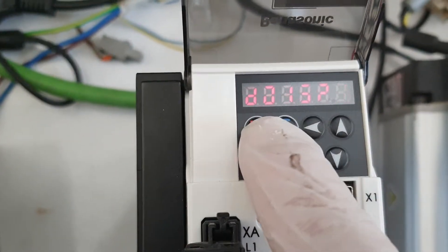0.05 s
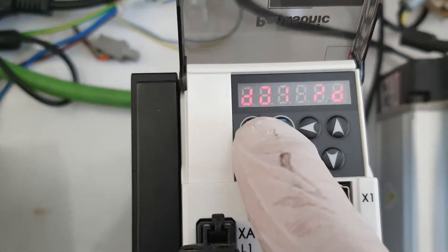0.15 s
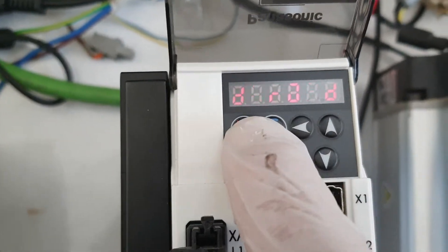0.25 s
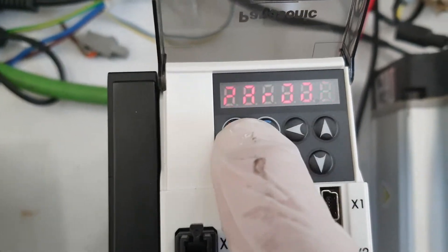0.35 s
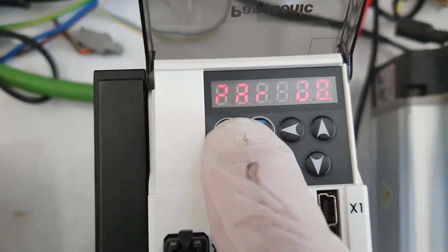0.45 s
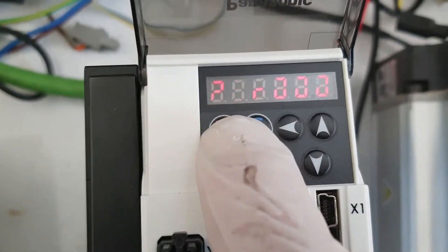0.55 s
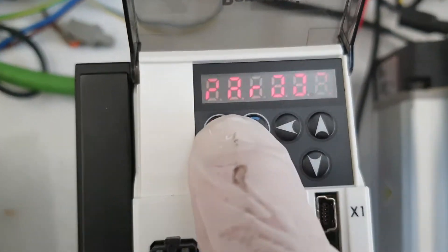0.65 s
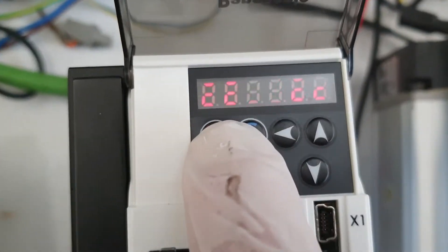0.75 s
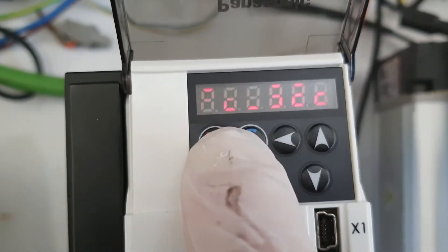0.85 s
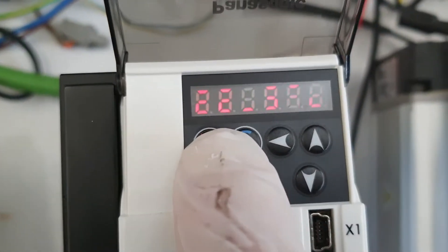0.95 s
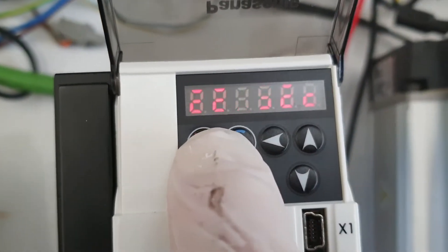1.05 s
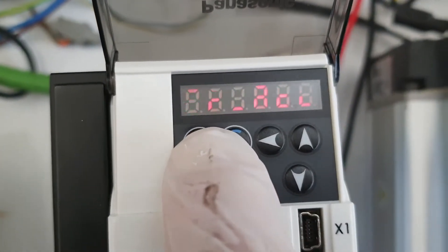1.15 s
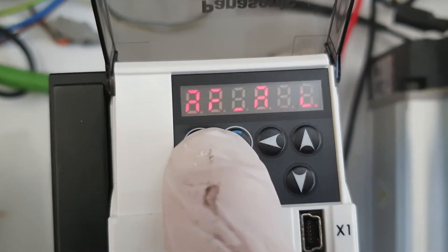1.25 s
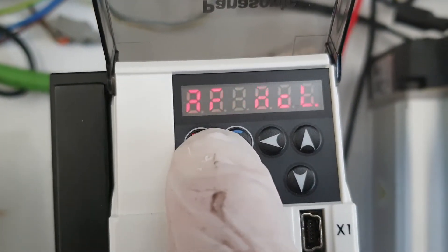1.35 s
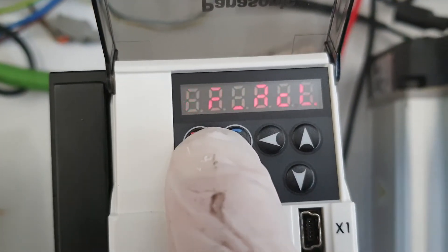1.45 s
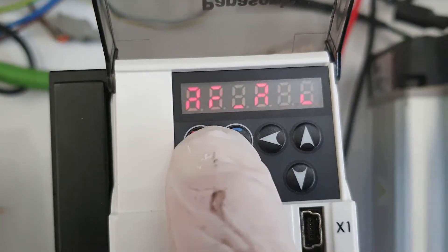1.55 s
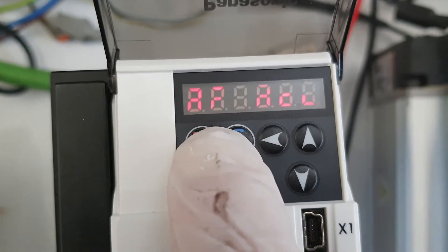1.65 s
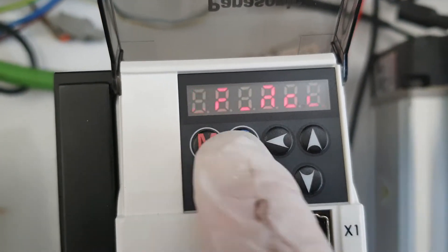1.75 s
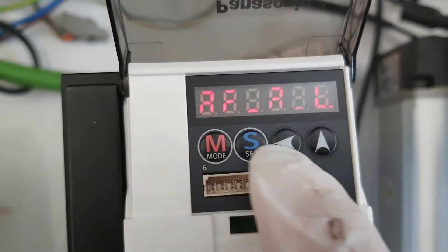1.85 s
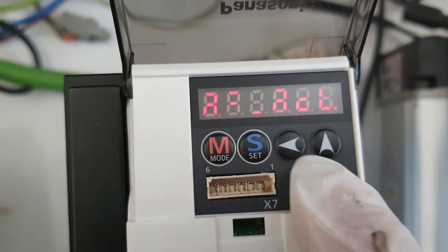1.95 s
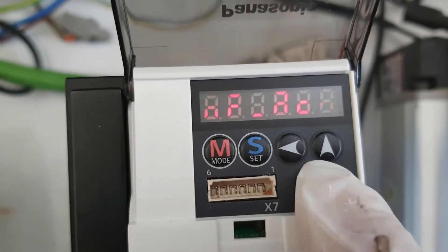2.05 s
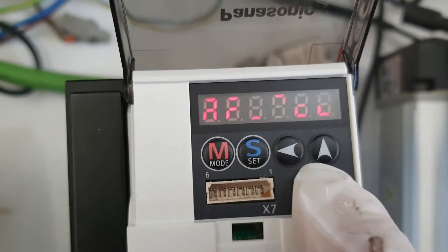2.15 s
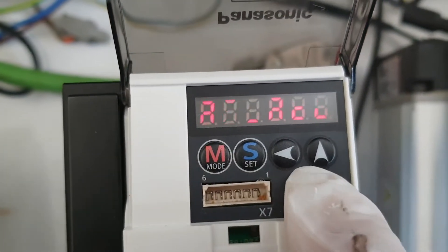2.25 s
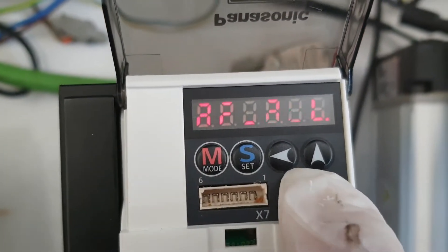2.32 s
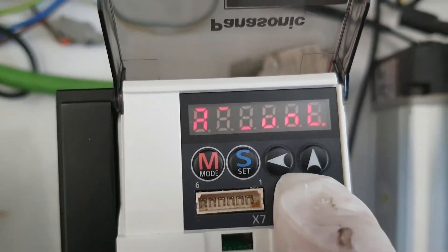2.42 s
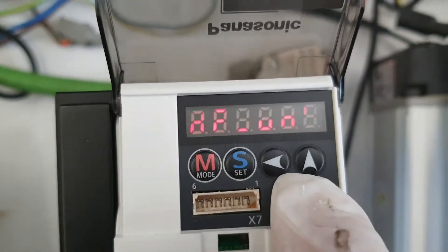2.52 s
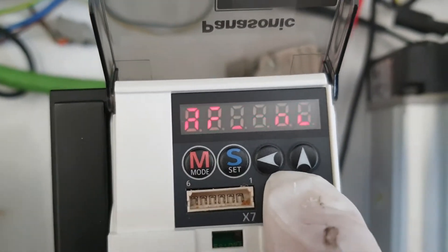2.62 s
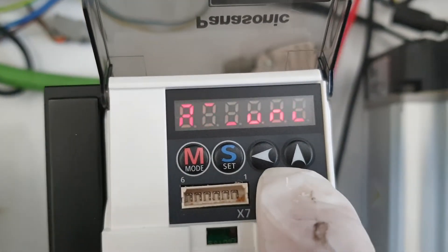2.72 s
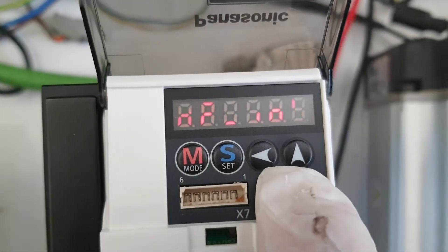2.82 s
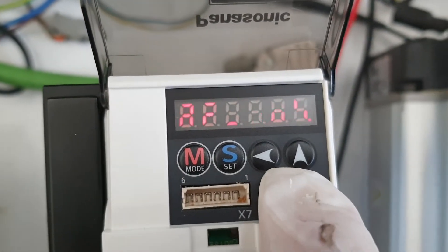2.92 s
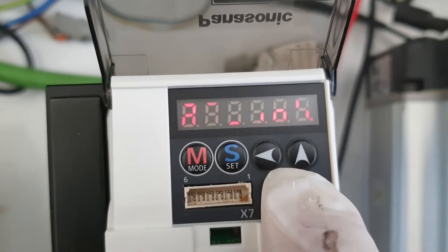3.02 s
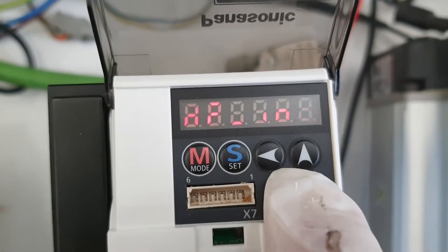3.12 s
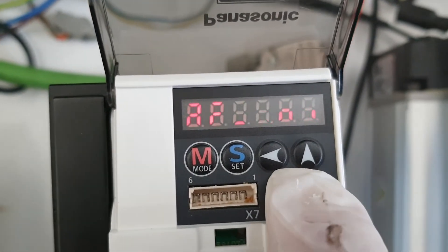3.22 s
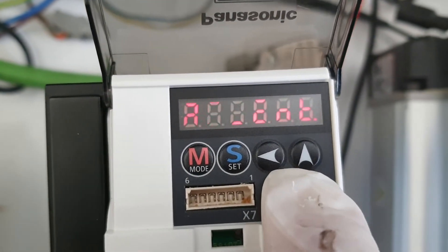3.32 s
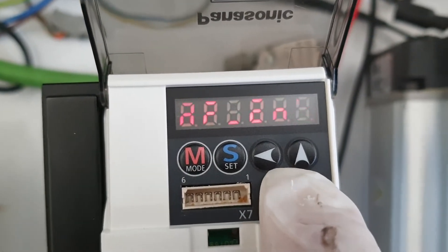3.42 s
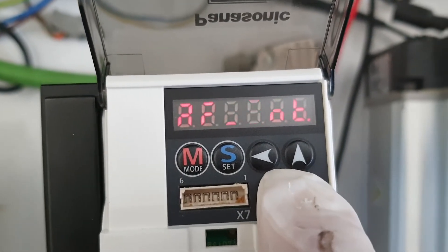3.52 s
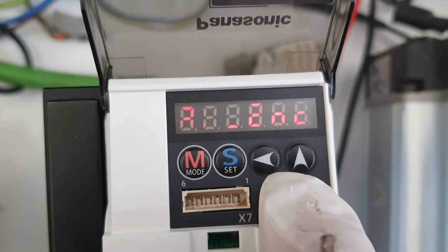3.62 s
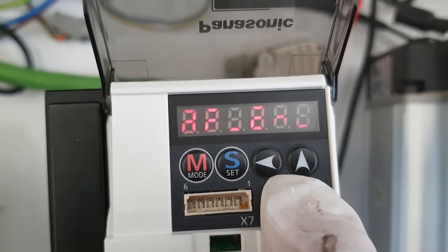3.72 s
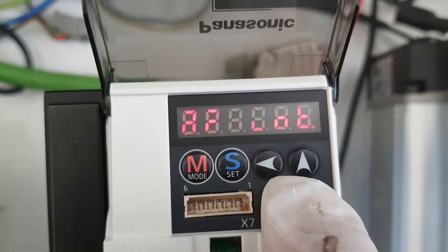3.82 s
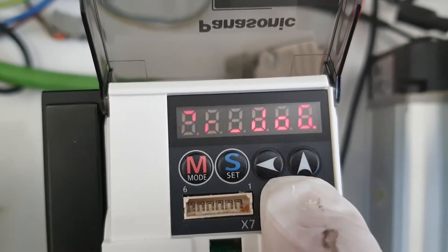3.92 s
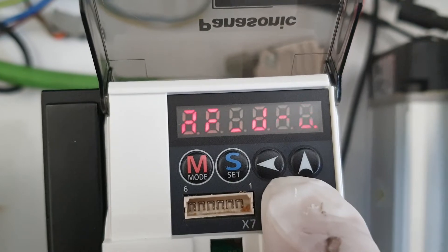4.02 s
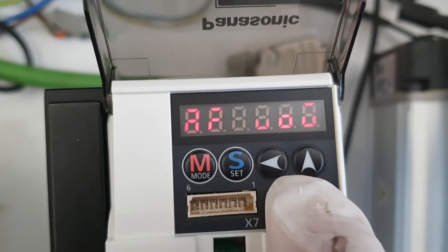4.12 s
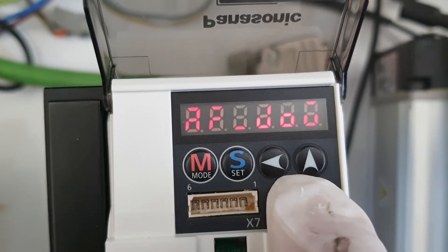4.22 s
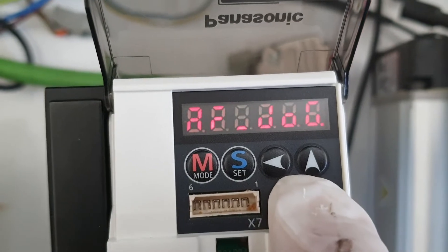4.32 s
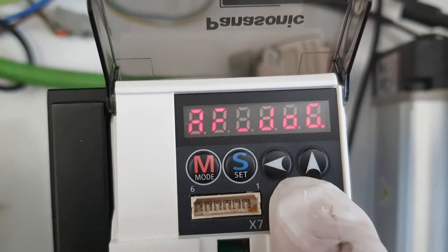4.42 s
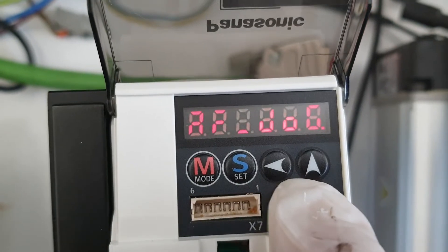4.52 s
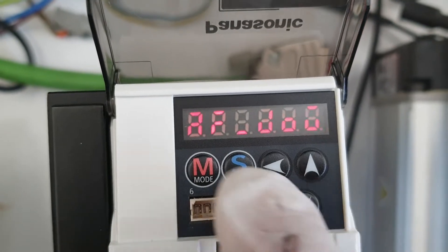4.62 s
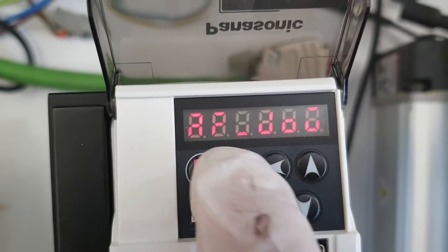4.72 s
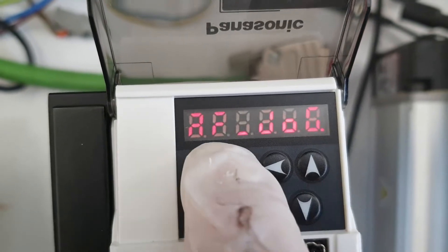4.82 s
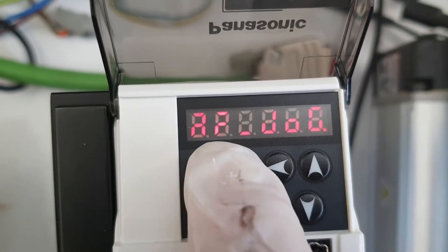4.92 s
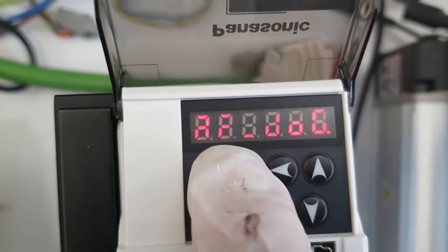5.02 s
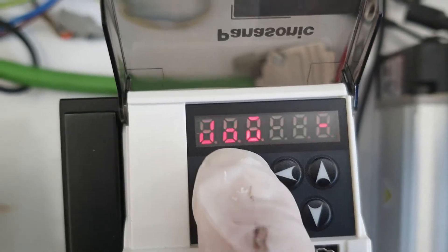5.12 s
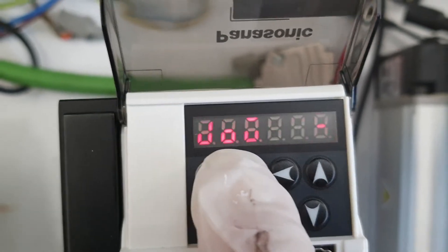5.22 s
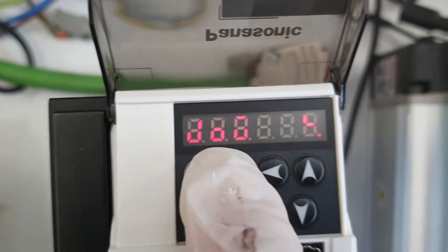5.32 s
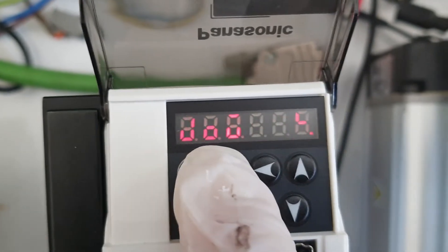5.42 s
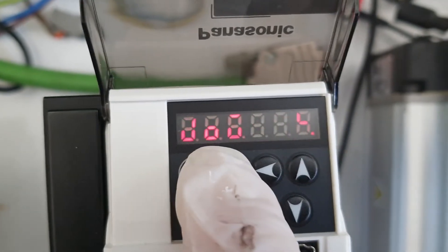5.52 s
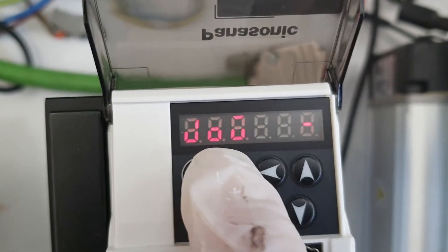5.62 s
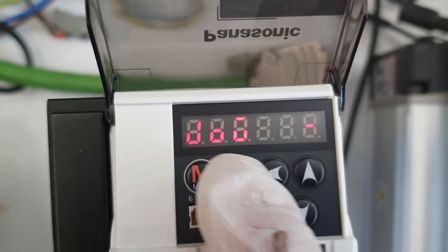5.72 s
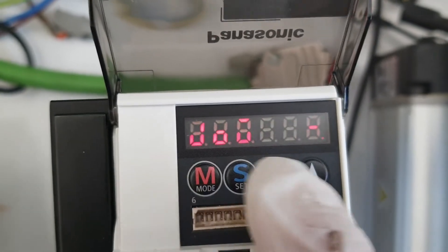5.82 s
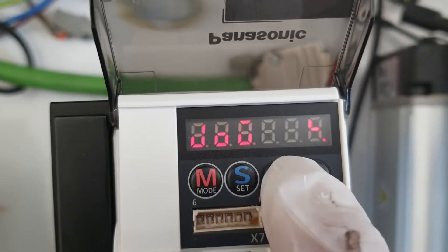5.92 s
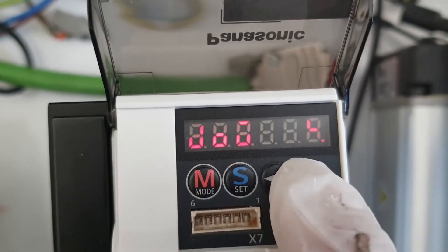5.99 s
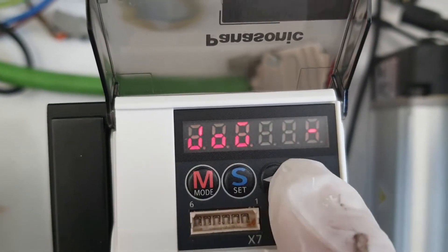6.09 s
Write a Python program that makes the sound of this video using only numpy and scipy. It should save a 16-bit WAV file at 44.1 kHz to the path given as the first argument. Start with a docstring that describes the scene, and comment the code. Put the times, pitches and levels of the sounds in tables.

```python
"""In a small workshop, a gloved finger works three little buttons on a motor drive's plastic panel.
Heard close up, the metal dome under each button snaps twice: going down and, louder, springing back.
Every snap makes the housing ring. The glove ticks and rustles on the plastic between the keys.
Ventilation fans hum steadily behind it, and the room adds a short echo to the clicks and the glove."""
import sys
import numpy as np
from scipy import signal
from scipy.fft import rfft, irfft, next_fast_len
from scipy.io import wavfile
from scipy.ndimage import map_coordinates

SR = 44100
rng = np.random.default_rng(int(sys.argv[2]) if len(sys.argv) > 2 else 0)


def to_wav(s):
    """Save 16-bit WAV."""
    ch = np.atleast_2d(s).T  # columns
    pcm = np.round(np.clip(ch, -1, 1) * 32767)  # PCM
    wavfile.write(sys.argv[1], SR, pcm.astype(np.int16))


N = 271215

# Levels in the tables are relative. A "lean" says how much louder the left side is than the right.
# each push of a button: down t/s, up t/s, key name, level/dB, treble slope of the release/(dB per octave)
KEYSTROKES = [(0.2717, 0.4395, "mode", -4.5, -21), (0.6941, 0.8483, "mode", -3, -10),
              (1.159, 1.3222, "mode", -3.5, -9), (2.3656, 2.5076, "arrow", -5, -4),
              (2.7522, 2.9313, "arrow", -5, -5), (3.254, 3.3923, "arrow", -5, -6.5),
              (3.907, 4.0548, "arrow", -5, -3), (5.1041, 5.1891, "set", -0.64, -4)]
# the side the fans are heard on: f/Hz, lean/dB
FAN_LEAN = [(30, -6), (100, -7.5), (300, -5.5), (600, -3), (1500, -4), (4000, -3), (12000, -2)]


def buttons(crack_db=-6, ring_db=0.32, rattle_db=-10, rattle_t60=0.042, attack_s=0.0004,
            lag_s=0.0001275, lid_s=0.0023, lid_db=-8.5, body_hz=2200, treble_hz=7200):
    """A snapping dome cracks; the housing rings and rattles. Returns the close sound and the room's share."""
    key_names = ["mode", "arrow", "set"]  # in the order of the level columns below
    # the notes the housing rings at (t60 is the time to fade by 60 dB):
    # f/Hz, t60/s, mode key level/dB, arrow key level/dB, set key level/dB, lean/dB
    housing_notes = [(990, 0.1, -49.5, -60, -46.5, -18.5), (1340, 0.053, -34, -31.5, -33, -3.5),
                     (1450, 0.046, -36, -39.5, -39.5, -5), (1718, 0.051, -40.5, -43, -50, -3.5),
                     (2238, 0.014, -27.5, -34, -30.5, -5.5), (2280, 0.026, -40, -60, -60.5, -18),
                     (2550, 0.015, -24.5, -31.5, -22, 7.5), (2730, 0.0053, -15, -35, -14.5, 6),
                     (2905, 0.024, -30, -43, -28.5, -7.5), (3596, 0.029, -31.5, -74, -34, 2),
                     (4188, 0.0092, -21, -18, -14.5, 16), (4117, 0.0057, -43, -16, -16.5, 25.5),
                     (5100, 0.016, -26, -24, -20, 3.5), (5300, 0.015, -35, -49, -28, 3.5),
                     (5980, 0.0038, -27.5, -34, -18, 27), (6460, 0.0021, -19.5, -21, -20, -23.5),
                     (7340, 0.0063, -20, -17, -24, -7), (7270, 0.0085, -14, -12, -37, 5.5),
                     (7880, 0.0011, -4, -8, -5.5, -4), (8800, 0.015, -67, -23, -25.5, 6.5),
                     (11200, 0.0037, -54.0, -24.5, -26, 6), (12000, 0.0093, -43.5, -61, -65, -19),
                     (12700, 0.0055, -33, -37, -47.5, -22), (14900, 0.0012, -55.0, -42, -27, -7)]
    crack_colour = [(150, -15.5), (500, -5), (1500, -15), (3200, -1), (4500, 0), (7500, 2.5), (9500, -9.5),
                    (12500, -6), (16000, -24.5)]  # the dome's own crack: f/Hz, level/dB
    casing_colour = [(200, -12), (700, -5.5), (1350, 2), (2100, 0), (2700, -0.5), (3300, -5.5), (4150, 1),
                     (5200, -1), (6500, 0), (8200, -3), (9800, -16.5), (13000, -11), (16000, -23)]  # the casing's many small notes blurred together: f/Hz, level/dB
    crack_lean_db = {"mode": -1, "arrow": 6, "set": 7}
    crack, casing = impulse(crack_colour), impulse(casing_colour)
    t = np.arange(len(crack)) / SR
    hz, t60, *key_db, lean_db = np.transpose(housing_notes)
    fade = amp(-60 * t / t60[:, None]) * (1 - np.exp(-t / attack_s))
    # neighbouring notes start in opposite directions; higher ones reach left and right out of step
    start_phase = np.pi * np.arange(len(hz)) - np.outer([0, 1], 1.92 * np.tanh(hz / 1900))
    close, into_room = np.zeros((2, 2, N))
    for s, key, db, body_db, treble_slope, room_db in dome_snaps():
        # the finger never lands twice on quite the same spot
        phase = start_phase + 0.12 * rng.standard_normal(len(hz))
        notes = np.sin(2 * np.pi * hz[:, None] * t + phase[:, :, None]) * fade
        note_gains = amp(key_db[key_names.index(key)]) * pan(lean_db)
        ring = np.einsum("cm,cmt->ct", note_gains, notes)  # add up the notes on each side
        # the keys are nearer the left, so the crack reaches the right later
        snap = filtered(pan(crack_lean_db[key]) * crack, lambda f: delay([0, lag_s], f))
        # the open lid throws it back a moment after
        snap = filtered(snap, lambda f: 1 + amp(lid_db) * delay(lid_s, f))
        jolts = rng.standard_normal((2, len(t))) * amp(-60 * t / rattle_t60)
        jolts /= np.linalg.norm(jolts[0])
        rattle = signal.fftconvolve(jolts, casing[None], axes=1)[:, :len(t)]
        click = amp(ring_db) * ring + amp(crack_db) * snap + amp(rattle_db) * rattle
        # a press is bright, a release duller
        body = lambda f: body_db / (1 + (f / body_hz) ** 6)
        treble = lambda f: treble_slope * np.log2(np.maximum(f / treble_hz, 1))
        touch = lambda f: amp(db + body(f) + treble(f))
        add(close, s, filtered(click, touch))
        add(into_room, s, amp(room_db) * filtered(np.array([casing, casing]), touch))
    return close, into_room


def dome_snaps(press_db=-10, press_body_db=1.5, press_db_per_octave=9.5, press_room_db=2):
    """A dome snaps down, then back. Going down is weaker, but fuller, brighter and more echoing."""
    body_db = {"mode": 0.2, "arrow": 1.5, "set": -0.5}  # how hard each key drives the housing's low notes: key name, level/dB
    for down, up, key, db, release_slope in KEYSTROKES:
        yield down, key, db + press_db, body_db[key] + press_body_db, press_db_per_octave, press_room_db
        yield up, key, db, body_db[key], release_slope, 0


def thin_ring(hz=2600, db=-69, t60=1.3):
    """A faint metallic ring lingers after the first press of the arrow key."""
    pressed_at = next(down for down, up, key, *_ in KEYSTROKES if key == "arrow")
    age = np.clip(np.arange(N) / SR - pressed_at, 0, None)
    return np.sin(2 * np.pi * hz * age) * amp(db - 60 * age / t60)


def glove_ticks(pop_size=0.51, gain_db=-2.0, chatter_db=-16.5, chatter_t60=0.022):
    """The rubber glove catches on the plastic and peels off with a tiny pop and a brief chatter."""
    ticks = [(0.212, -39, 0, -1), (0.6525, -34, 2, 4), (1.7766, -36.5, 4, 1), (1.8439, -19, 2, -1.3),
             (1.861, -24.5, 8, 2), (1.9521, -25.5, 12.5, 2), (1.955, -30, 3, 2.5), (1.967, -22, 7.5, 1.5),
             (2.23, -39, -2, 0), (2.2607, -24, 2, -1), (4.6378, -35, 6, 2), (5.031, -40, -9, -1.5),
             (5.8169, -38, 8, 5)]  # each catch: t/s, level/dB, lean/dB, brightness/(dB per octave)
    tick_colour = [(300, -21), (1200, 0.5), (2500, -0.5), (4000, -2), (7000, -1), (10000, -6.5),
                   (16000, -12.5)]  # the tone of a tick: f/Hz, level/dB
    out = np.zeros((2, N))
    for s, db, lean_db, brightness in ticks:
        pop = impulse([(hz, level + brightness * np.log2(hz)) for hz, level in tick_colour])
        t = np.arange(len(pop)) / SR
        force = amp(chatter_db - 60 * t / chatter_t60) * rng.standard_normal((2, len(t)))
        force[:, 0] += pop_size
        tick = signal.fftconvolve(force, pop[None], axes=1)
        add(out, s, amp(db + gain_db) * pan(lean_db) * tick)
    return out


def glove_slides(gain_db=-2, grain_db=2.5, lean_db=2, swell_db=23.5):
    """The sliding glove rustles in fine, uneven grains, loudest when it moves fastest."""
    slides = [(1.84, -55.5, 0.13, 0.17, -12), (4.64, -61.5, 0.078, 0.012, -2),
              (5.858, -59, 0.16, 0.14, -5.5), (6.024, -67.5, 0.048, 0.078, 3)]  # each slide: fastest t/s, level/dB, rise/s, fall/s, swish over rub/dB
    rub_colour = [(800, -13), (2500, -9), (5500, 0), (8000, -0.5), (10000, -8), (16000, -22)]  # the broad rub of the finger pad: f/Hz, level/dB
    swish_colour = [(3000, -30), (7000, -5), (9500, 2), (13000, 7), (15500, 2), (16500, -12)]  # the thin swish of a light touch: f/Hz, level/dB
    t = np.arange(N) / SR
    grain = amp(grain_db * wobble(500))
    rub = unit(filtered(rng.standard_normal((2, N)) * grain, lambda hz: amp(along(rub_colour, hz))))
    swish = unit(filtered(rng.standard_normal((2, N)) * grain, lambda hz: amp(along(swish_colour, hz))))
    out = np.zeros((2, N))
    for s, db, rise, fall, swish_db in slides:
        away = np.maximum((s - t) / rise, (t - s) / fall)  # 0 at the peak, 1 at either end
        out += (away < 1) * amp(db - swell_db * away) * (rub + amp(swish_db) * swish)
    return amp(gain_db) * pan(lean_db) * out


def workshop_echo(sound, tail_db=-16.5, early_db=-16, early_t60=0.1, delay_s=0.005):
    """Sound bounces off the bench and nearby gear at once, and off the walls in a short tail."""
    wall_fade = [(300, 0.35), (1500, 0.5), (5000, 0.38), (8000, 0.3), (10000, 0.3), (15000, 0.39)]  # how long the tail takes to fade by 60 dB: f/Hz, t60/s
    hz, t, noise = signal.stft(rng.standard_normal((2, SR // 2)), SR, nperseg=256)
    tail = signal.istft(noise * amp(-60 * t / along(wall_fade, hz)[:, None]), SR, nperseg=256)[1]
    age = np.arange(tail.shape[1]) / SR
    early = rng.standard_normal(tail.shape) ** 3 * amp(-60 * age / early_t60)  # cubing makes it spiky
    echo = amp(tail_db) * tail / np.linalg.norm(tail[0])
    echo += amp(early_db) * early / np.linalg.norm(early[0])
    echo = np.pad(echo, ((0, 0), (round(delay_s * SR), 0)))
    return signal.fftconvolve(sound, echo, axes=1)[:, :N]


def ventilation(rumble_db=-45.5, wander_db=0.87, air_db=-57, tone_gain_db=-2, cutoff_hz=650):
    """Fans rumble through their ducts, with wavering tones and a soft rush of air."""
    rumble_colour = [(20, -46), (34, -38), (44, -7), (60, -12.5), (85, -3), (108, -1.5), (172, -1.5),
                     (215, -7.5), (255, -6.5), (285, 1), (330, -1), (380, -7.5), (450, -11), (600, -19.5)]  # the low rumble: f/Hz, level/dB
    air_colour = [(400, -1.5), (620, -3.5), (850, 1.5), (1150, -5.5), (1600, -10.5), (2500, -14),
                  (3100, -27.5), (5900, -28), (6700, -22.5), (8700, -23.5), (9400, -36.5), (12000, -34.5),
                  (15800, -31), (16300, -55)]  # rushing air and faint hiss: f/Hz, level/dB
    fan_tones = [(140.0, -58), (296.1, -55), (360.7, -59.5), (802.1, -70)]  # the hum of fans and motors: f/Hz, level/dB
    t = np.arange(N) / SR
    duct = lambda hz: amp(along(rumble_colour, hz)) / np.sqrt(1 + (hz / cutoff_hz) ** 10)
    rumble = amp(rumble_db + wander_db * wobble(6)) * fan_noise(duct)
    air = amp(air_db) * fan_noise(lambda hz: amp(along(air_colour, hz)))
    hum = 0
    for hz, db in fan_tones:
        tone = np.sin(2 * np.pi * hz * t + 0.97 * wobble(7))
        tone *= amp(1.7 * wobble(4.93))
        hum += amp(db + tone_gain_db) * pan(along(FAN_LEAN, hz)) * unit(tone)
    return rumble + air + hum


def fan_noise(gain, lead_s=0.00013):
    """Noise that fills the room: left and right are alike in the bass, unrelated in the treble."""
    likeness = [(40, 0.99), (130, 0.91), (330, 0.88), (640, 0.49), (1400, 0), (4000, 0)]  # how well the two sides match: f/Hz, likeness (0 to 1)
    width = lambda hz: np.arccos(np.clip(along(likeness, hz), -1, 1)) / 2
    shares = lambda hz: gain(hz) * [np.cos(width(hz)), np.sin(width(hz))]
    mid, side = filtered(rng.standard_normal((2, N)), shares)
    # the fans stand to the right: louder and earlier there
    arrival = lambda hz: pan(along(FAN_LEAN, hz)) * delay([lead_s, 0], hz)
    return unit(filtered(np.array([mid + side, mid - side]), arrival))


def amp(db):
    """Turn decibels into a factor to multiply by."""
    return 10 ** (np.asarray(db) / 20)


def unit(x):
    """Scale a sound to an average strength (rms) of 1."""
    return x / np.sqrt(np.mean(x ** 2) + 1e-20)


def along(points, hz):
    """Read between the rows of an (f/Hz, value) table, on a log frequency scale."""
    freqs, values = np.transpose(points)
    return np.interp(np.log(hz + 1), np.log(freqs + 1), values)


def pan(lean_db):
    """Left and right gains for a given lean."""
    return amp(np.array([lean_db, -lean_db]).reshape(2, -1) / 2)


def delay(seconds, hz):
    """The filter response that makes a sound arrive later."""
    return np.exp(-2j * np.pi * np.outer(seconds, hz))


def wobble(rate):
    """A smooth curve through `rate` random values a second."""
    return map_coordinates(rng.standard_normal(int(N * rate / SR) + 4), [np.arange(N) * rate / SR])


def filtered(x, response):
    """Multiply each frequency in x by response(hz)."""
    n = x.shape[-1]
    padded = next_fast_len(2 * n)
    return irfft(rfft(x, padded) * response(np.fft.rfftfreq(padded, 1 / SR)), padded)[..., :n]


def impulse(colour, size=4096):
    """A sharp click of energy 1, its tone set by an (f/Hz, level/dB) table."""
    cepstrum = irfft(np.log(amp(along(colour, np.fft.rfftfreq(size, 1 / SR)))))
    # folding it in half packs the energy at the start of the click
    cepstrum[1:size // 2] *= 2
    cepstrum[size // 2 + 1:] = 0
    pulse = irfft(np.exp(rfft(cepstrum)))
    return pulse / np.linalg.norm(pulse)


def add(track, s, sound):
    """Mix a stereo sound into the track at s seconds."""
    part = track[:, round(s * SR):][:, :sound.shape[1]]
    part += sound[:, :part.shape[1]]


def scene():
    """The hand at the panel, its echo and the hum behind it."""
    clicks, into_room = buttons()
    glove = glove_ticks() + glove_slides()
    return clicks + thin_ring() + glove + workshop_echo(into_room + glove) + ventilation()


def record(dry, top_hz=16600):
    """Cut away the very highest treble."""
    return filtered(dry, lambda hz: hz < top_hz)


dry = scene()
out = record(dry)
to_wav(out)
```